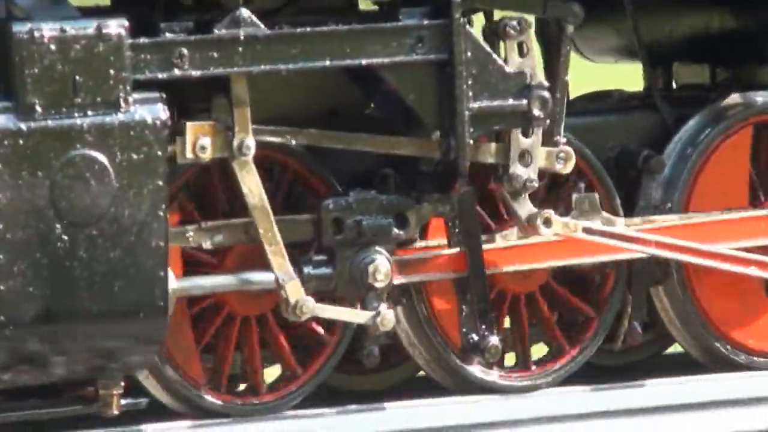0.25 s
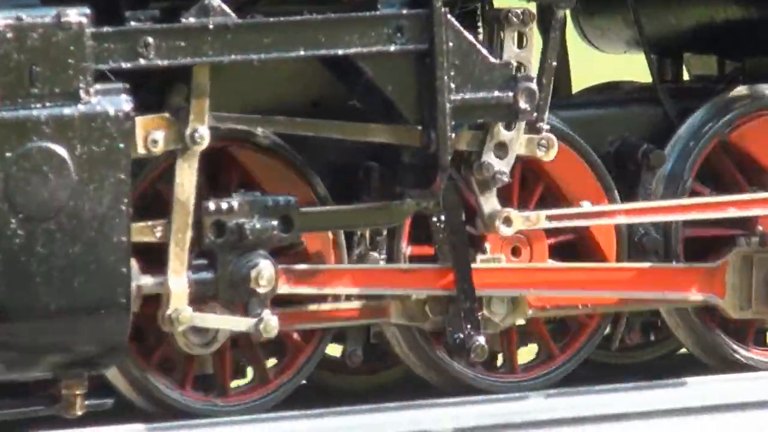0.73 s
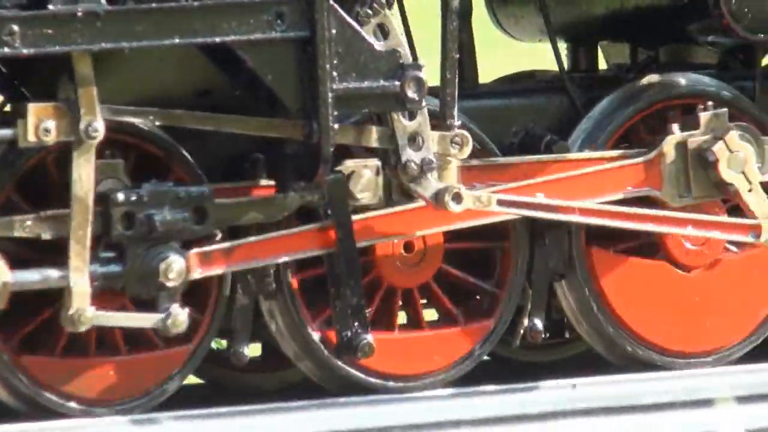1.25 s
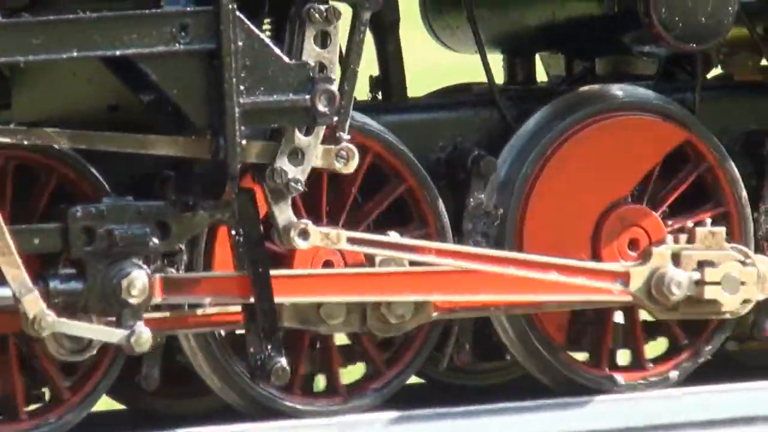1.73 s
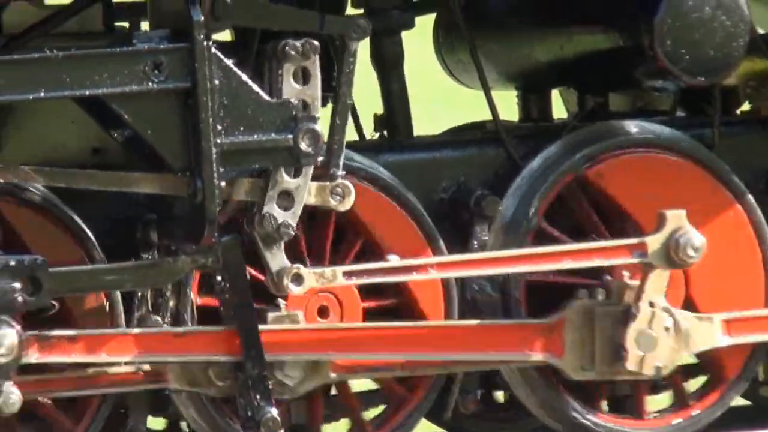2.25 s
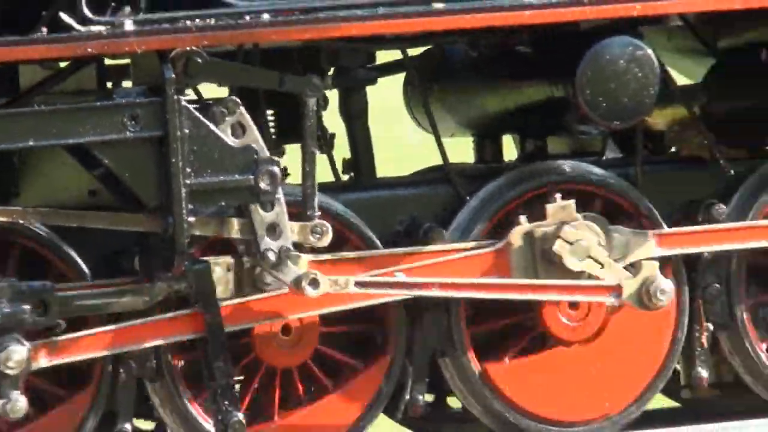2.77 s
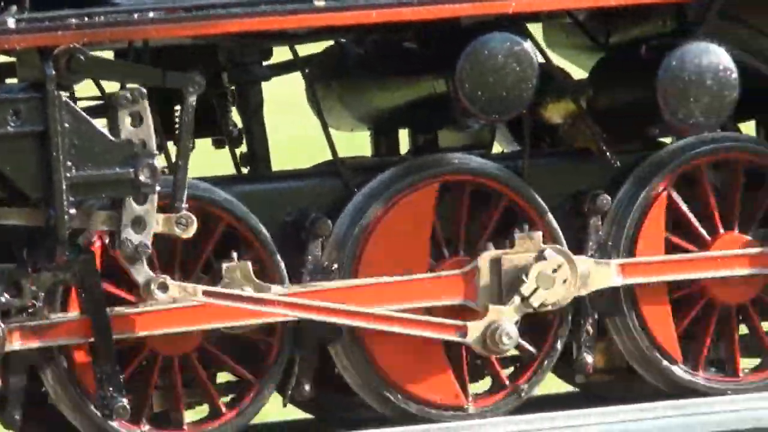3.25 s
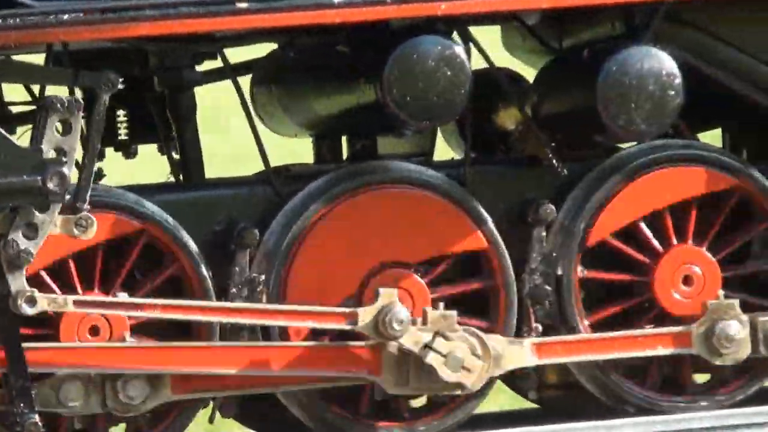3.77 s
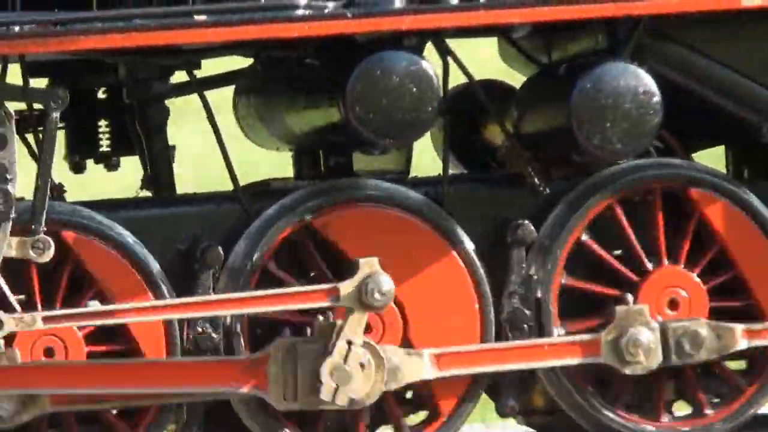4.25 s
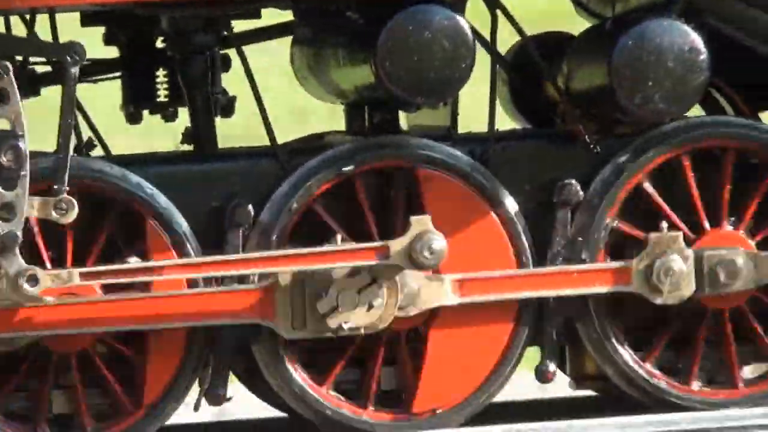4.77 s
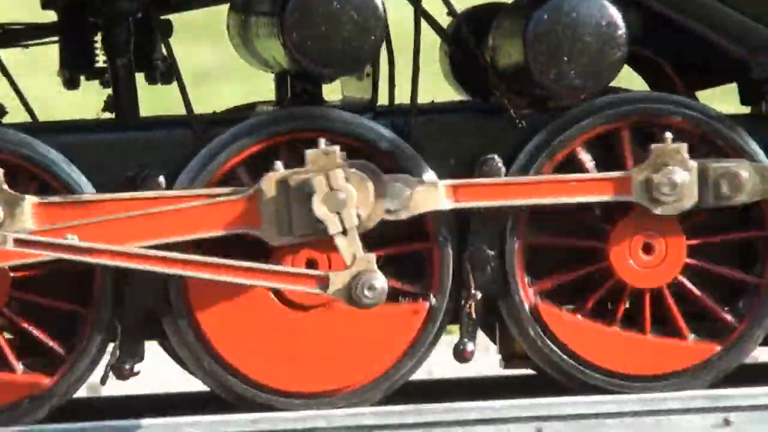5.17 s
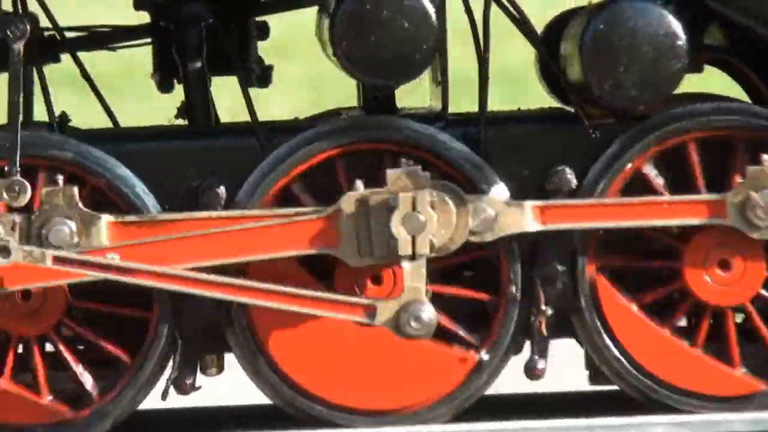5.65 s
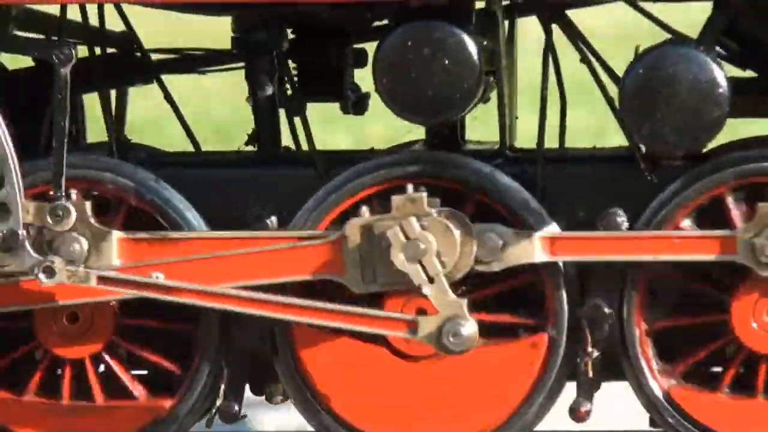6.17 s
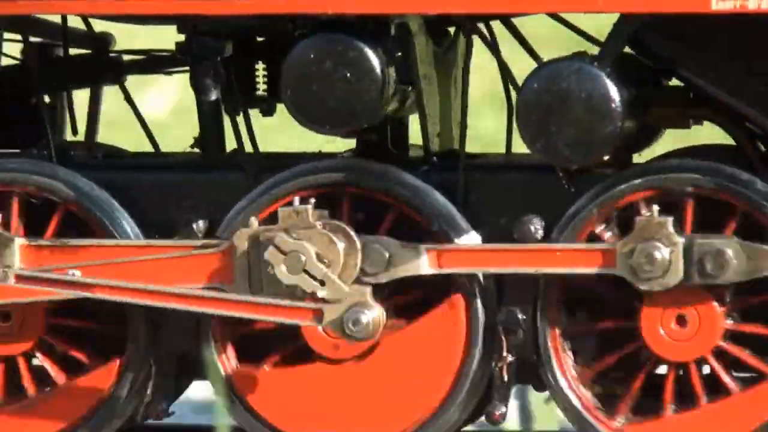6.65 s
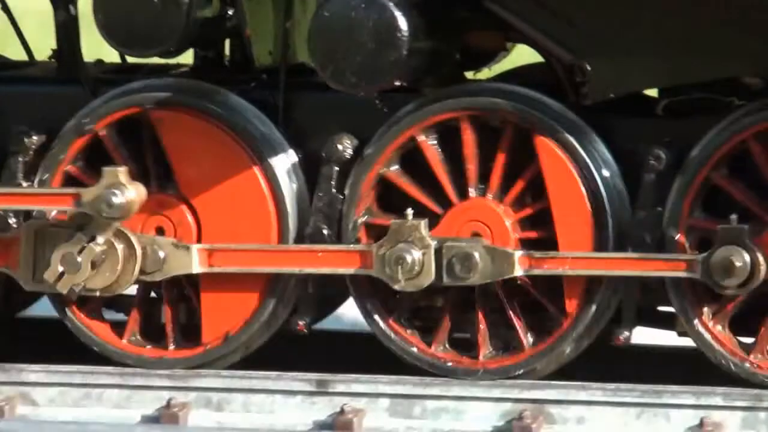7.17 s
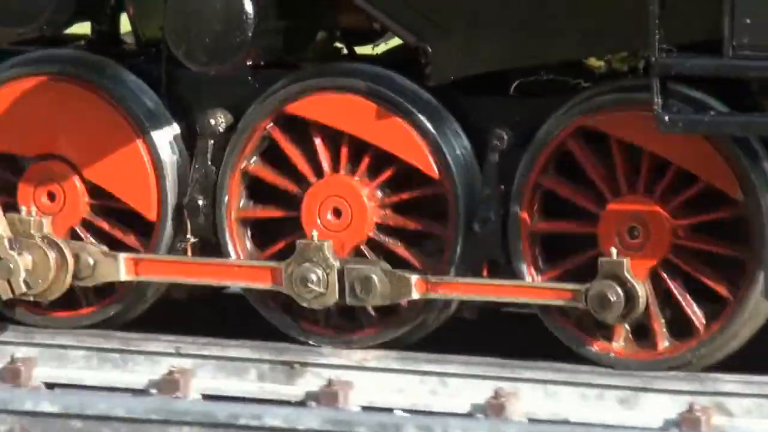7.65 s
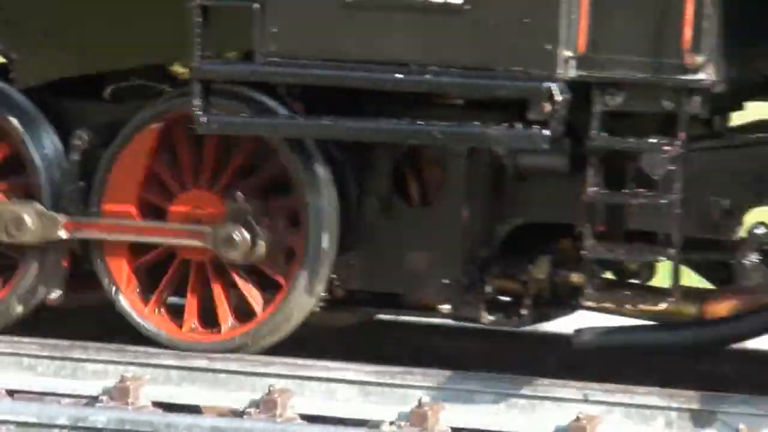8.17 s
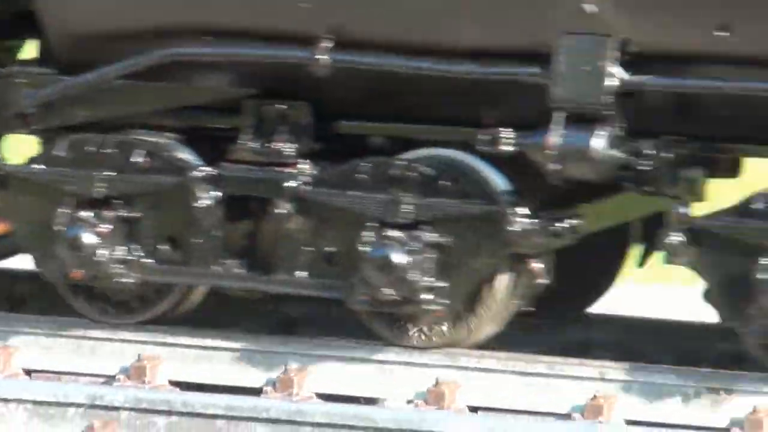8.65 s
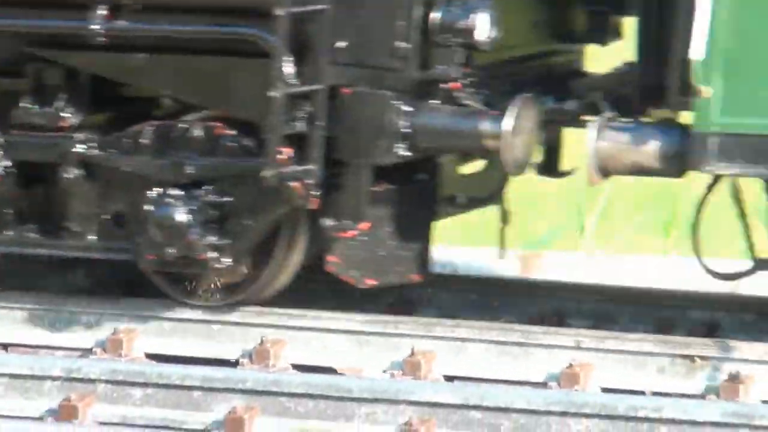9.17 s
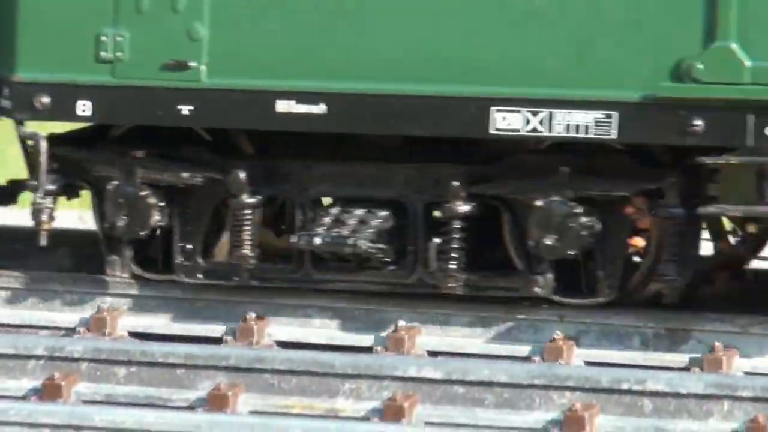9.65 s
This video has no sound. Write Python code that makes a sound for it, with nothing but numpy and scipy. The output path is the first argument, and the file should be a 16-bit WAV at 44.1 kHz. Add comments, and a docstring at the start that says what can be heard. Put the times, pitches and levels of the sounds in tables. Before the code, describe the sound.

A small live-steam locomotive runs past a close microphone outdoors. From the start, crisp steam puffs come about five a second, four to each wheel turn and slightly uneven. Each opens with a sharp high fizz, carries a breathy ring around five kilohertz and a sputtering hiss, with a duller roar from the chimney swelling just after. By 3 seconds the beats are nearer six a second; by 5 about eight, shorter and fuller; from 8 onward around ten, almost a purr of hisses. A gland leaks a thin steady hiss throughout, strongest near 6 seconds, when the wheel rumble also rises. Soft low wind bumps touch the microphone near 1, 3, 4 and 7 seconds, with the strongest about 9.2. A deeper rolling note surfaces around 6.8, and again from 8.5 as tender and wagon pass; the steam recedes a little and the stereo image widens until the end, still chuffing.

```python
"""A live-steam model locomotive chuffs past on a garden railway, slowly gathering speed.
Four times a wheel turn a valve lets spent steam out of the blast pipe: it fizzes, rings at the nozzle
and, a little later, roars in the chimney. All along, a gland leaks, the wheels rumble on the rails and a
light wind buffets the microphone. Later the deep note of tender and wagon comes up and the sound widens.
Every layer is shaped noise; sliding echoes comb the steam and the low sounds."""
import sys
import numpy as np
from scipy import signal
from scipy.fft import rfft, irfft
from scipy.io import wavfile

SR = 44100
rng = np.random.default_rng(int(sys.argv[2]) if len(sys.argv) > 2 else 0)


def int16_out(signal):
    """Quantize to a 16-bit WAV file."""
    q = np.round(np.clip(np.atleast_2d(signal).T, -1, 1) * 32767)
    wavfile.write(sys.argv[1], SR, q.astype(np.int16))


N = 437472
TIME = np.arange(N) / SR
HZ = np.fft.rfftfreq(N, 1 / SR)


def gain_of(db):
    """Decibels to amplitude."""
    return 10 ** (np.asarray(db) / 20)


def evened(x):
    """Scales to an rms of one, taken over all channels together."""
    return x / np.sqrt(np.mean(x ** 2) + 1e-20)


def spectrum(points):
    """Joins (frequency [Hz], level [dB]) points on a log-frequency axis."""
    hz, db = np.transpose(points)
    return np.interp(np.log(HZ + 1), np.log(hz + 1), db)


def curves(rows):
    """Draws every column of a timed table as a line, sample by sample."""
    s, *columns = np.transpose(rows)
    return [np.interp(TIME, s, column) for column in columns]


def noise(colour_db):
    """Stereo turbulence of a given colour, rms one: a middle and a quieter, independent side."""
    # stereo width: (frequency [Hz], level of the side against the middle [dB])
    width_points = [(30, -29), (70, -1.5), (150, -25), (350, -17.5), (600, -18), (780, -14), (1050, -17),
                    (1350, -19), (1900, -30.5), (2800, -12.5), (5400, -10), (6500, -8), (9000, -9.5),
                    (13000, -18.5)]
    real, imaginary = rng.standard_normal((2, 2, len(HZ)))
    mid, side = (real + 1j * imaginary) * gain_of(colour_db)
    side = side * gain_of(spectrum(width_points))
    return evened(irfft(np.array([mid + side, mid - side]), N))


def wander(rate_hz):
    """Random drift up to about the given rate, rms one."""
    lowpass = 1 / (1 + (HZ / rate_hz) ** 4)
    return evened(irfft(rfft(rng.standard_normal(N)) * lowpass, N))


def breathy_tone(hz, width_hz, skirt_hz):
    """Turbulence in a resonance whose centre follows the curve hz; a second pole steepens its skirts."""
    # shift the centre down to zero, low-pass there, then shift back up
    turn = np.exp(2j * np.pi * np.cumsum(hz) / SR)
    x = noise(0) * turn.conj()
    for pole in np.exp(-np.pi * np.array([width_hz, skirt_hz]) / SR):
        x = signal.lfilter([1 - pole], [1, -pole], x)
    return evened((turn * x).real)


def chuffs():
    """Four beats a wheel turn: (start s, length of the turn s, valve opening time s, jet dB, roar dB)."""
    # turns of the driving wheels: (time [s], jet level [dB], chimney roar level [dB]), before beats and mix
    wheel_turns = [(0.077, -20.5, -29.5), (0.912, -19.5, -28), (1.688, -19.5, -28.5), (2.431, -19, -28),
                   (3.137, -18.5, -27), (3.809, -18.5, -26), (4.425, -18, -25), (4.992, -18, -25),
                   (5.515, -18, -26), (6.007, -18.5, -24.5), (6.469, -18, -24.5), (6.906, -18, -23.5),
                   (7.328, -18.5, -24.5), (7.743, -18.2, -24.5), (8.149, -17, -24.5), (8.533, -17, -26.5),
                   (8.916, -17.5, -27), (9.299, -18.5, -27.9), (9.675, -19, -29.7)]
    # beats of a turn, a little out of square:
    # (place [share of turn], valve opening time [share of turn], jet offset [dB], roar offset [dB])
    turn_beats = [(0, 0.012, -0.5, 0.13), (0.259, 0.018, 0.54, 1), (.466, 0.025, .5, 0.34),
                  (.705, 0.017, -0.24, 0)]
    # turn length at which the offsets apply as written; slower turns are more uneven, faster ones less
    uneven_turn_s = 0.62

    lengths = np.diff([row[0] for row in wheel_turns])
    rows = []
    for (s, jet_db, roar_db), turn_s in zip(wheel_turns, [*lengths, lengths[-1]]):
        uneven = turn_s / uneven_turn_s
        for place, opening, beat_jet_db, beat_roar_db in turn_beats:
            beat_s = s + place * turn_s
            beat_levels = jet_db + uneven * beat_jet_db, roar_db + uneven * beat_roar_db
            rows.append((beat_s, turn_s, opening * turn_s, *beat_levels))
    return np.transpose(rows)


def exhaust(levels_db, lag_s, stretch, push_db, push_s, steepness):
    """Steam flow: each cylinder blows down, then its piston pushes the rest out until the port narrows."""
    # share of a turn a cylinder empties in, before stretch: the chuffs shorten as speed rises
    blow_down_turns = 0.095
    # the port narrows just before the next beat and shuts just after it has begun
    port_closing_s, port_overlap_s = 0.023, 0.0018

    flow = np.zeros(N)
    starts, turns_s, openings, _, _ = chuffs()
    next_starts = [*starts[1:], np.inf]
    for s, following, turn_s, opening_s, level_db in zip(starts, next_starts, turns_s, openings, levels_db):
        shut_s = following + port_overlap_s
        span = (TIME >= s) & (TIME < shut_s)
        t = TIME[span] - s
        valve = np.minimum(t / (opening_s + lag_s), 1)
        blow_down = 1 / (1 + (t / (blow_down_turns * turn_s * stretch)) ** steepness)
        push = gain_of(push_db) * np.exp(-t / push_s)
        port = np.clip((shut_s - TIME[span]) / port_closing_s, 0, 1)
        flow[span] += gain_of(level_db) * valve * np.hypot(blow_down, push) * port
    return flow


def jet():
    """The blast pipe: fizz while the pressure is high, a longer hiss, and the nozzle's breathy ring."""
    # tone of the jet along the way, levels before the mix:
    # (time [s], nozzle ring [Hz], ring level [dB], hiss level [dB], centre of the fizz [Hz])
    jet_tone = [(0.1, 5220, -1.5, -5.5, 10450), (1.5, 5040, -2.5, -4.5, 9840), (3.7, 4890, -3, -3.5, 9600),
                (5.0, 5700, -3.5, -1.5, 9000), (6.1, 5830, -4.5, -0.5, 9900),
                (6.8, 5660, -1.1, -0.4, 10250), (8.0, 5600, 1.2, -3, 9660), (8.6, 5590, -1.5, -7.5, 9950),
                (9.8, 5490, 0, -9.5, 10240)]
    # narrow core of the nozzle's ring: (time [s], pitch [Hz], level before the mix [dB])
    whistle_path = [(0, 5400, -1), (1.5, 5400, -8), (3, 5250, -5.5), (4.3, 5570, -12.5), (5.2, 5450, -6),
                    (6.2, 5360, 1), (7.2, 5360, -4), (8.2, 5330, -7.5), (9.9, 5700, -19)]
    # broad hump in the hiss, sinking until about 7.5 s, then rising again:
    # (time [s], centre [Hz], level against the hiss [dB])
    hump_path = [(0, 4050, 1), (2, 4100, -1.5), (3.7, 3900, -2), (5, 3660, -5.5), (6.3, 3150, -17),
                 (7.5, 3050, -17), (8.6, 3450, -9), (9.9, 3800, -2.5)]
    # colours of fizz and hiss: (frequency [Hz], relative level [dB per Hz])
    fizz_colour = [(3000, -35), (5800, -17), (7000, -3.5), (8200, 0.5), (9900, 1), (11000, 4.5),
                   (12000, -5.5), (13000, -8), (14200, -23), (15800, -41)]
    hiss_colour = [(500, -15.5), (1200, -6), (1800, -3.5), (2400, -1), (3200, 0), (3900, 0), (4500, -3.5),
                   (5900, 0.5), (6700, -5), (8000, -1), (10800, -8.5), (13000, -25), (14500, -35),
                   (15800, -39)]

    ring_hz, ring_db, hiss_db, fizz_hz = curves(jet_tone)
    whistle_hz, whistle_db = curves(whistle_path)
    hump_hz, hump_db = curves(hump_path)
    *_, levels_db, _ = chuffs()
    fast = exhaust(levels_db, lag_s=0.0015, stretch=0.92, push_db=-19.5, push_s=0.27, steepness=4.4)
    slow = exhaust(levels_db, lag_s=0.0002, stretch=1.15, push_db=-13.5, push_s=0.42, steepness=3.08)

    fizz_band = breathy_tone(fizz_hz, width_hz=1600, skirt_hz=2300)
    fizz = evened(noise(spectrum(fizz_colour)) + 0.97 * fizz_band)
    hump = breathy_tone(hump_hz, width_hz=2200, skirt_hz=1600) * gain_of(hump_db)
    hiss = (noise(spectrum(hiss_colour)) + hump) * gain_of(hiss_db + 1.5)

    # the ring never sits quite on the same pitch from beat to beat
    drift_hz = 80 * wander(rate_hz=9)
    ring = breathy_tone(ring_hz + drift_hz, width_hz=1000, skirt_hz=1380) * gain_of(ring_db + 2)
    core = breathy_tone(whistle_hz + drift_hz, width_hz=340, skirt_hz=648.15) * gain_of(whistle_db + 4)

    # fizz leans slightly left, the nozzle slightly right
    nozzle = (ring + core) * gain_of([[-0.55], [0.55]])
    fizz_puffs = gain_of(-4) * fizz * fast * gain_of([[0.25], [-0.25]])
    steam = fizz_puffs + gain_of(-5.5) * (hiss + nozzle) * slow
    # wet steam sputters: all its bands flutter together
    sputter_db = 1.1 * wander(rate_hz=220) + 0.35 * wander(rate_hz=82)
    return steam * gain_of(sputter_db)


def chimney():
    """The jet drags air through smokebox and chimney; this roar builds a little later."""
    # colour of the roar: (frequency [Hz], relative level [dB per Hz])
    roar_colour = [(60, -21), (120, -13.5), (190, -1), (300, 1), (420, 1.5), (550, -1), (800, -0.5),
                   (1100, -11.5), (1700, -21), (3000, -24.5)]
    # air resonances of chimney and smokebox: (centre [Hz], width [Hz], lift [dB])
    air_resonances = [(308, 85, 1.5), (666, 230, 3), (827, 83, 2.5), (1015, 94, 7), (1408, 320, 9.5)]

    colour_db = spectrum(roar_colour)
    for hz, width_hz, lift_db in air_resonances:
        colour_db = colour_db + lift_db / (1 + (2 * (HZ - hz) / width_hz) ** 2)
    *_, roar_db = chuffs()
    draught = exhaust(roar_db, lag_s=0.012, stretch=1.21, push_db=-17.5, push_s=0.18, steepness=3.7)
    return gain_of(3) * noise(colour_db) * draught


def leak():
    """A gland by the cylinder hisses on without a break, under and between the beats."""
    # colour of the leak: (frequency [Hz], relative level [dB per Hz])
    leak_colour = [(1000, -24), (1700, -8), (2500, 0), (3400, 0.5), (4400, -6), (5350, -1), (6000, -6.5),
                   (6600, -15), (7300, -1), (7900, 3), (9000, -16), (11000, -10), (12500, -15),
                   (15500, -34)]
    # strength of the leak: (time [s], level before a 6 dB cut [dB])
    leak_levels = [(0, -31.5), (1.5, -37), (3, -34.5), (4.5, -33.5), (6, -29.5), (7.3, -32), (8.5, -33),
                   (9.9, -37.5)]
    leak_db, = curves(leak_levels)
    flutter_db = 0.21 * wander(rate_hz=40)
    return noise(spectrum(leak_colour)) * gain_of(leak_db - 6 + flutter_db)


def running_gear():
    """Wheels rumble and swish on the track; the tender and wagon behind add a deeper note."""
    # strength of the wheel rumble (before a 0.5 dB cut) and of tender and wagon: (time [s], level [dB])
    wheel_levels = [(0, -41), (1.7, -39), (3, -38.5), (4.5, -39.5), (6.2, -32.5), (7.3, -35), (8.5, -35.5),
                    (9.3, -36), (9.9, -37.5)]
    wagon_levels = [(0, -58), (5.5, -61), (6.8, -42.5), (7.7, -53), (8.5, -45), (9.3, -45), (9.9, -42)]
    # colours of wheel rumble, wagon rumble and rolling swish: (frequency [Hz], relative level [dB per Hz])
    rumble_colour = [(50, -18), (110, -4.5), (200, -2.5), (350, 4.5), (600, 1.5), (950, -14), (1500, -28),
                     (4000, -63)]
    wagon_colour = [(60, -15), (110, -11), (155, -4.5), (220, -15), (500, -21), (2000, -49)]
    rolling_colour = [(90, -8), (300, -1), (800, -4.5), (1600, -14.5), (3500, -15), (6500, -15.5),
                      (10000, -14), (15500, -42)]

    wheel_db, = curves(wheel_levels)
    wagon_db, = curves(wagon_levels)
    wheels = noise(spectrum(rumble_colour)) * gain_of(wheel_db - 0.5)
    wagons = noise(spectrum(wagon_colour)) * gain_of(wagon_db)
    uneven_db = 1.8 * wander(rate_hz=25)
    swish = gain_of(-40.5) * noise(spectrum(rolling_colour))
    return (wheels + wagons) * gain_of(uneven_db) + swish


def wind():
    """Soft, low buffets on the microphone: each gust swells and dies away over a light breeze."""
    # colour of the buffets: (frequency [Hz], relative level [dB per Hz])
    wind_colour = [(8, -25), (22, 1), (40, -6.5), (65, -10.5), (110, -20), (250, -18.5), (800, -70)]
    # gusts: (time of the peak [s], half length [s], level [dB])
    gust_rows = [(0.3, .2, -43), (1.0, 0.067, -33), (1.712, 0.18, -34), (2.985, 0.067, -34),
                 (3.15, .05, -29.5), (3.97, .09, -32.5), (4.3, 0.24, -37), (6.5, .09, -35),
                 (7.176, 0.078, -32), (7.8, 0.36, -37.5), (9.195, 0.085, -26.5), (9.52, 0.16, -36)]
    breeze_db = -45

    power = gain_of(breeze_db) ** 2
    for s, half_s, db in gust_rows:
        power = power + gain_of(db) ** 2 * np.exp(-((TIME - s) / half_s) ** 2)
    flutter_db = 2.2 * wander(rate_hz=10)
    return noise(spectrum(wind_colour)) * np.sqrt(power) * gain_of(flutter_db)


def echo(x, path):
    """One reflection with a sliding delay: it combs the sound like a slow flanger."""
    delay_s, share = curves(path)
    return share * np.array([np.interp(TIME - delay_s, TIME, channel) for channel in x])


def scene():
    """The engine passes in the open air; its low sounds also bounce off the track bed."""
    # echoes off nearby surfaces, whose paths change as the engine moves, and off the ground:
    # (time [s], delay [s], share reflected [amplitude ratio]); the far echo is then panned
    near_path = [(0, 0.0013, 0.072), (2.5, 0.0011, 0.047), (4, 0.00086, 0.053), (5.5, 0.00073, 0.06),
                 (6.8, 0.000775, 0.093), (7.6, 0.00063, 0.033), (9.9, 0.00079, 0.075)]
    far_path = [(0, 0.0025, .05), (5, 0.0017, 0.082), (6.8, .00185, 0.06), (8, 0.0013, 0.18),
                (8.7, 0.00134, .22), (9.9, 0.00121, 0.1)]
    ground_path = [(0, 0.00071, 0.022), (3, 0.00093, 0.14), (5, 0.00081, 0.05), (7.3, 0.0011, 0.29),
                   (8.5, 0.00091, 0.36), (9.9, 0.00086, 0.16)]
    # stereo spread, wider once the chimney has gone past: (time [s], gain of the side [dB])
    spread_levels = [(0, -3.5), (4, -2), (6.3, -1.5), (8, -1), (9, 1), (9.9, 3.5)]

    low = chimney() + running_gear()
    steam = jet() + leak()
    far = echo(steam, far_path) * gain_of([[-7], [3]])  # weaker left, stronger right
    steam = steam + echo(steam, near_path) + far
    left, right = steam + low + echo(low, ground_path)

    spread_db, = curves(spread_levels)
    mid = (left + right) / 2
    side = (left - right) / 2 * gain_of(spread_db)
    return np.array([mid + side, mid - side]) + wind()


def record(dry):
    """The highest treble is softened, and nothing is heard above about 15.8 kHz."""
    # softening of the highest treble: (frequency [Hz], gain [dB])
    treble_points = [(12500, 0), (13600, -3), (15000, -9), (15800, -11)]
    edge_hz = 15800
    softened = irfft(rfft(dry) * gain_of(spectrum(treble_points)), N)
    lowpass = signal.firwin(511, edge_hz, window=("kaiser", 9), fs=SR)
    return signal.oaconvolve(softened, lowpass[None], "same")


dry = scene()
out = record(dry)
int16_out(out)
```